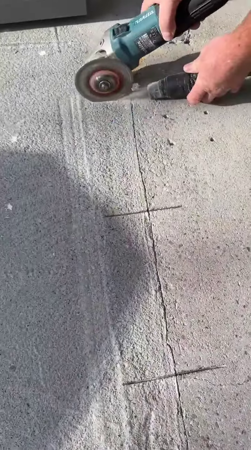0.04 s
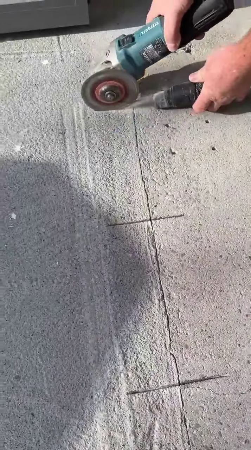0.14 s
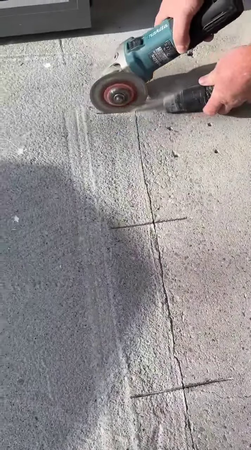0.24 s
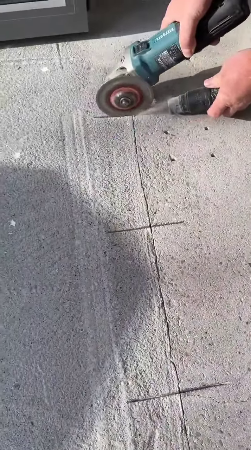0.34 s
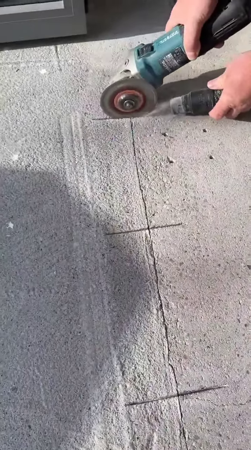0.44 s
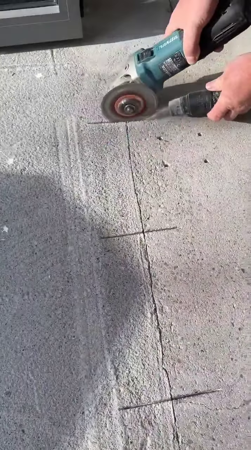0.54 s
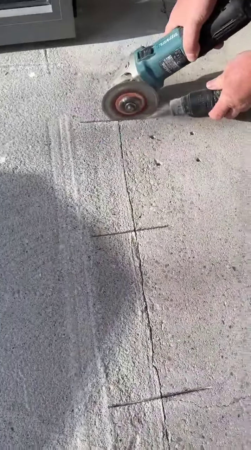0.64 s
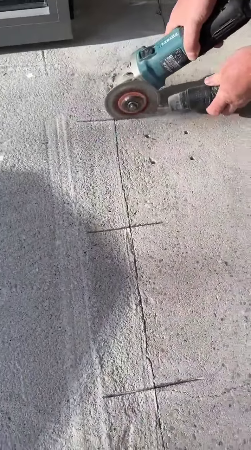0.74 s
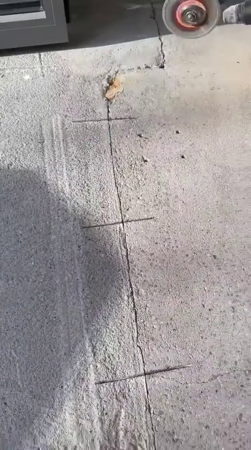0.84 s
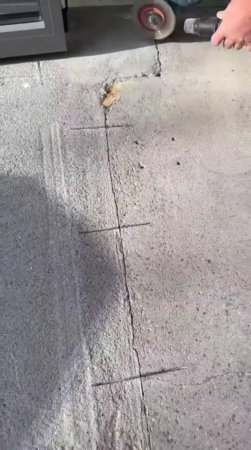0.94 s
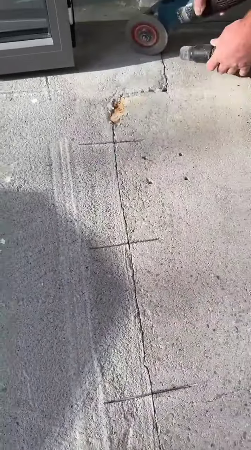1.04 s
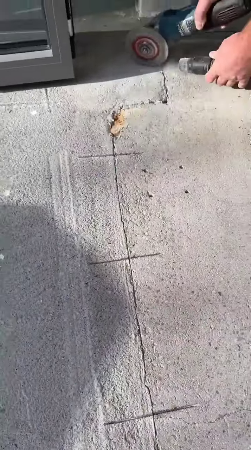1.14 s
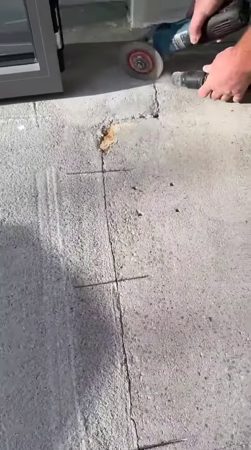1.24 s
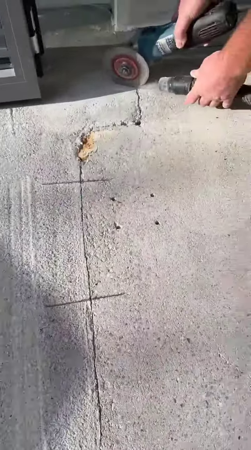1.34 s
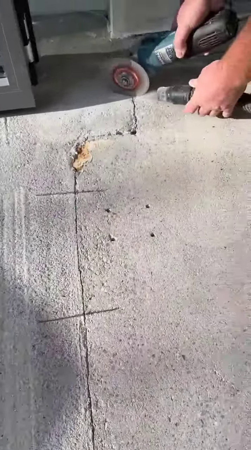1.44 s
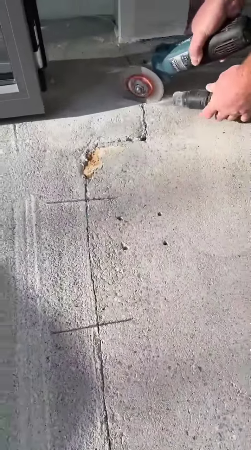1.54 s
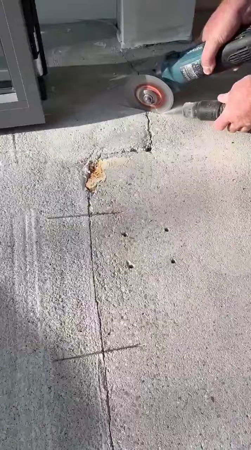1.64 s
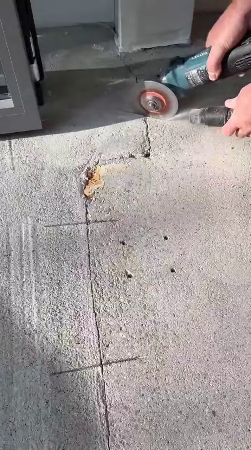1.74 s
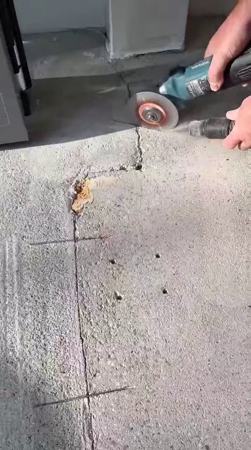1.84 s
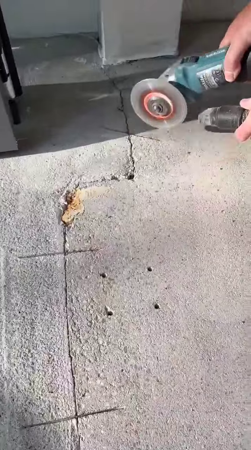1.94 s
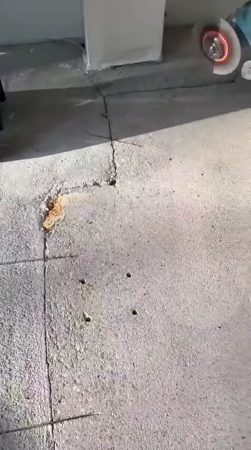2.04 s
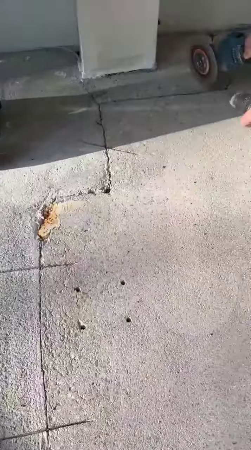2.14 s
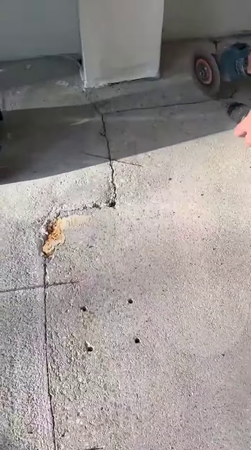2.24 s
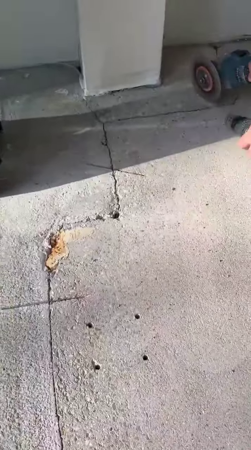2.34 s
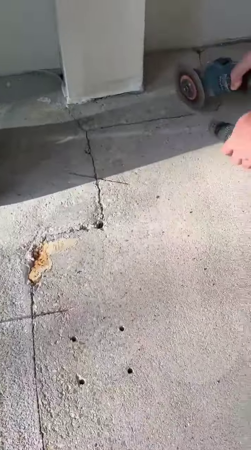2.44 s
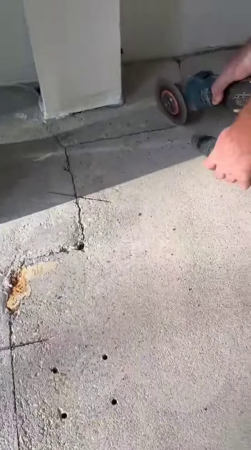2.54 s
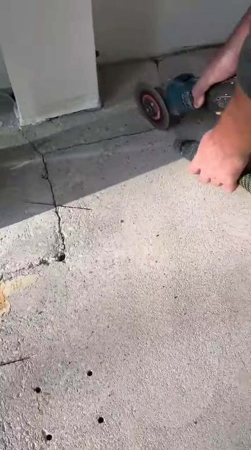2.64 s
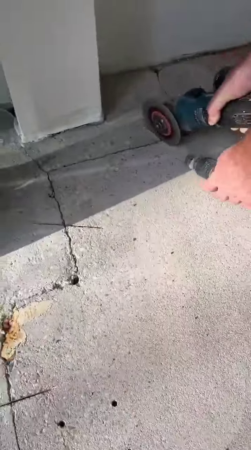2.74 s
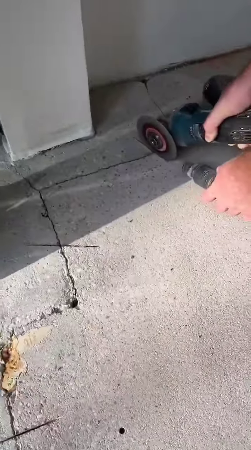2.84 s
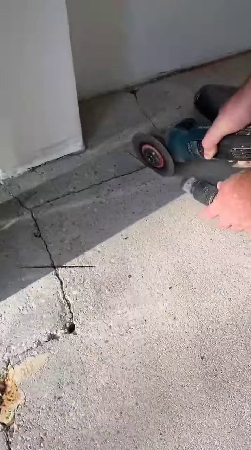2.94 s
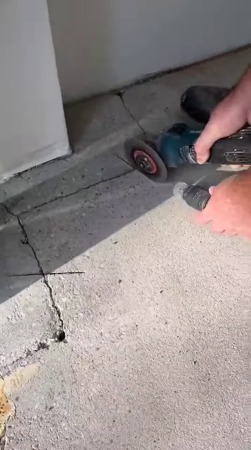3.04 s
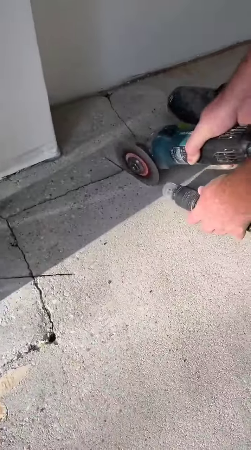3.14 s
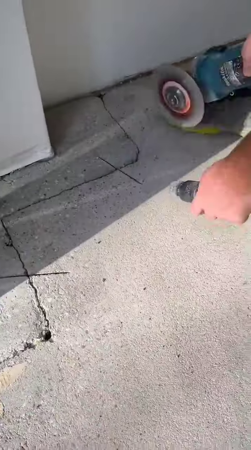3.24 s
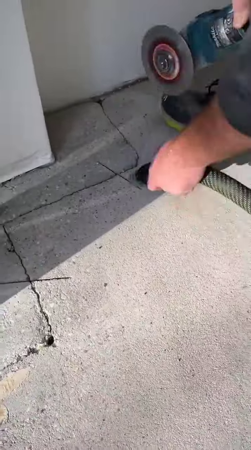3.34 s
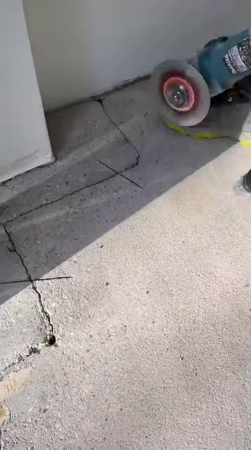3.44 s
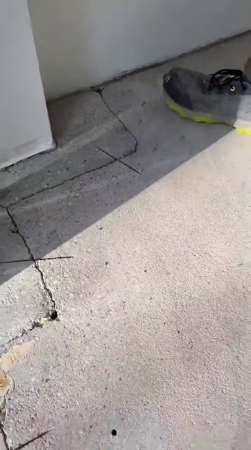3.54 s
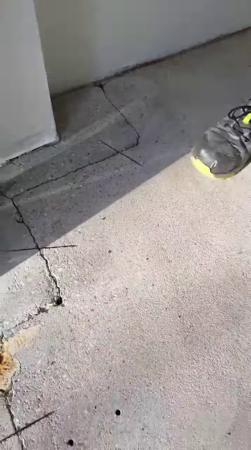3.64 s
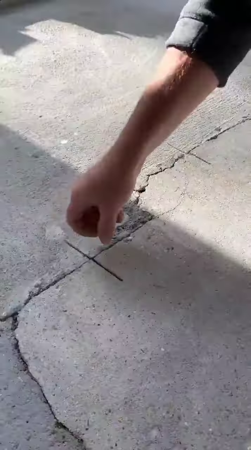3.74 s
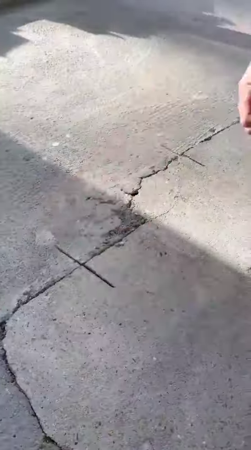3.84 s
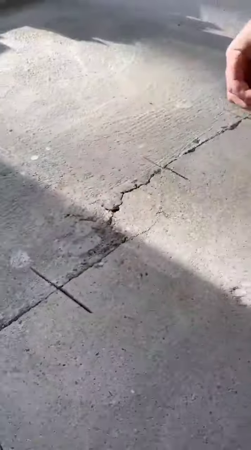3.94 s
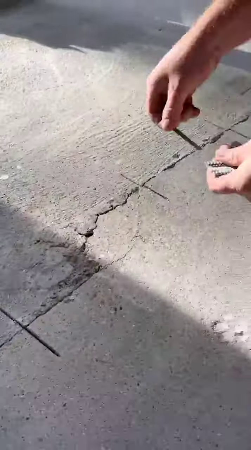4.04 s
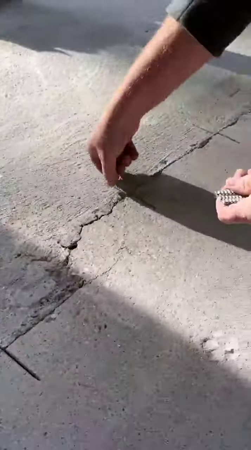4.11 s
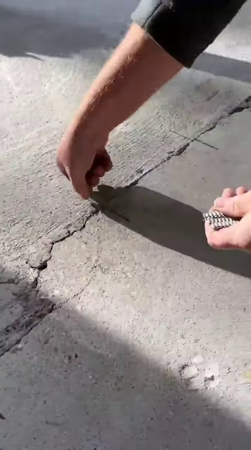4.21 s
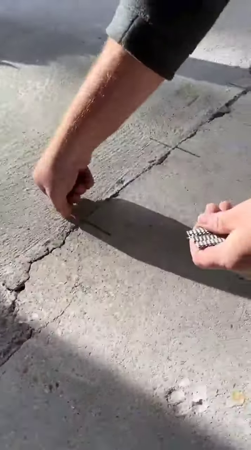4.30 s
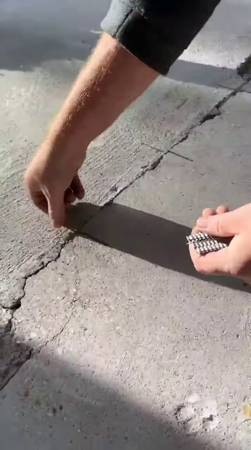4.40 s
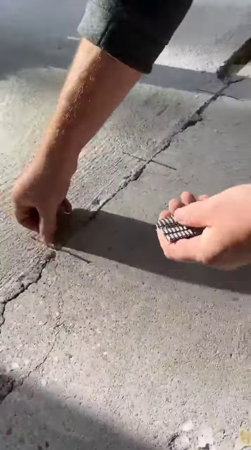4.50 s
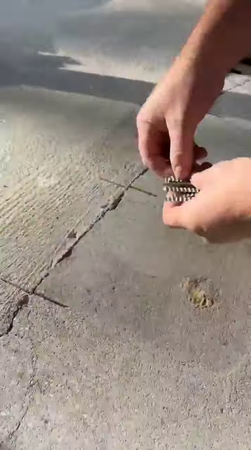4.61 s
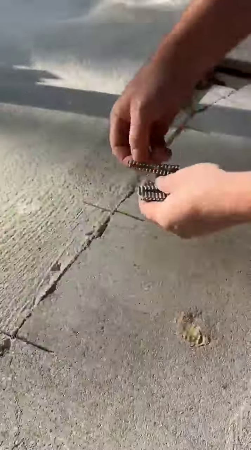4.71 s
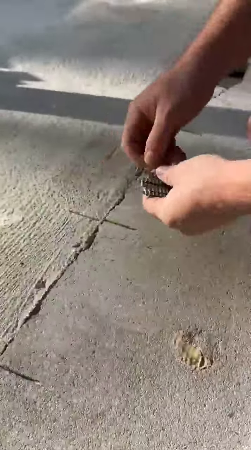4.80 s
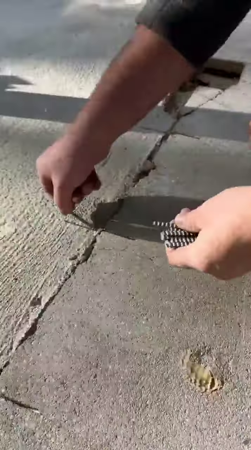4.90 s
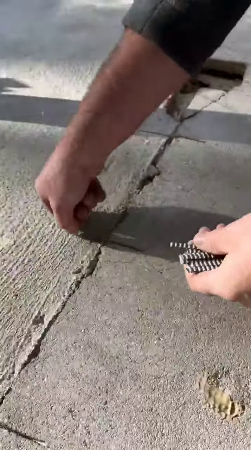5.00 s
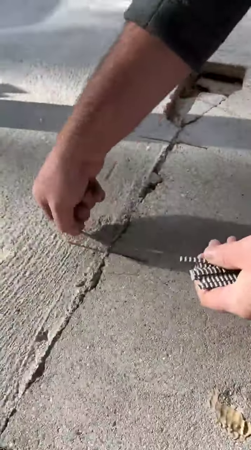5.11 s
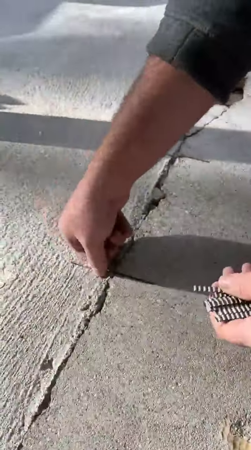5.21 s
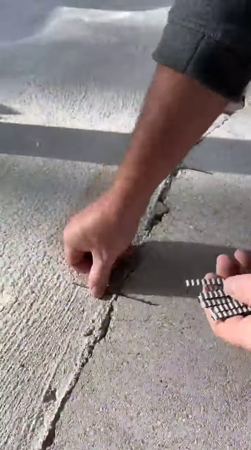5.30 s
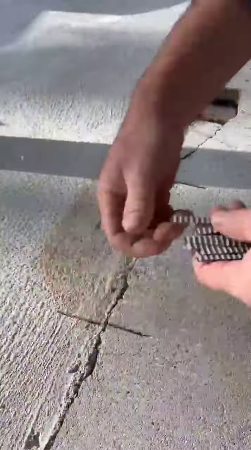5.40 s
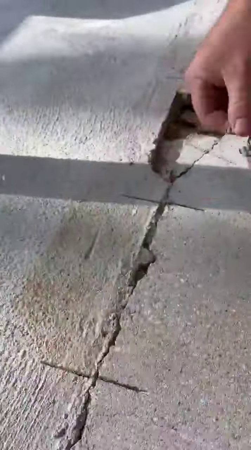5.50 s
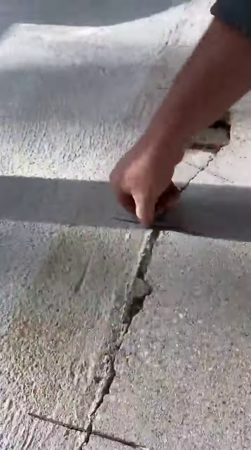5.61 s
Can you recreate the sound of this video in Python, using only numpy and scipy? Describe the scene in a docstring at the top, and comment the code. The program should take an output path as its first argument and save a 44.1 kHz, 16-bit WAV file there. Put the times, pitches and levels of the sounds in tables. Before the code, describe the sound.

An angle grinder cuts three short slots in cement with harsh ringing bursts, cuts off abruptly, then metal pins tick and scrape quietly.

```python
"""An angle grinder cuts three short slots in a cement floor, the first already under way, and runs free
between. Grit and slab impacts are coloured noise; the disc rings as narrow resonances over the turbulent fan
rush. The fan whine sags under load; brief squeals mark the groove and low thumps break in; near echoes shift
the colour. After the last cut the fan grows louder, then the scene changes to a quiet room with room tone,
cloth and rumble. Steel pins then tick and scratch, strokes scrape over gritty cement, and soft bumps jostle the
microphone."""
import sys
import numpy as np
from scipy import signal
from scipy.fft import rfft, irfft
from scipy.io import wavfile

SR = 44100
rng = np.random.default_rng(int(sys.argv[2]) if len(sys.argv) > 2 else 0)


def materialize(psi):
    """Save the field psi as 16-bit PCM at rate SR to the path in sys.argv[1].

    A 1-D psi becomes a single channel; in a 2-D psi each row is a channel.
    """
    bounded = np.clip(np.atleast_2d(psi).T, -1, 1)
    quanta = np.round(bounded * 32767).astype(np.int16)
    wavfile.write(sys.argv[1], SR, quanta)


N = 249596
T = np.arange(N) / SR  # time [s]
HZ = np.fft.rfftfreq(N, 1 / SR)  # frequency bins [Hz]
SCENE_CHANGE = 3.745  # the scene changes from the grinder to the pins [s]

# Cuts, with base levels at full depth: touch_s, lift_s, grind_db, crunch_db (slab), whine_db (loaded motor)
CUTS = [(-0.7, 0.778, -24, -42.3, -62), (1.06, 1.93, -23.9, -42.5, -58),
        (2.226, 3.172, -23.2, -41.3, -51.5)]
# Fan vents swing towards the microphone: peak_s, half_length_s, draught_db, whine_db (base levels)
SWINGS = [(0, .22, -52.5, -70), (1.347, 0.21, -56, -66), (2.26, .13, -54.5, -51.5), (2.6, .17, -53.5, -70),
          (3.56, .18, -58, -53.5)]


def gain_of(db):
    """Logarithmic level: converts decibels to an amplitude ratio."""
    return 10 ** (np.asarray(db) / 20)


def evened(x):
    """Normalization of mean power: scales to an rms of 1."""
    return x / np.sqrt(np.mean(abs(x) ** 2) + 1e-20)


def spectra(rows):
    """Interpolation on a logarithmic frequency axis: each column of a table, at every bin."""
    hz, *columns = np.transpose(rows)
    return [np.interp(np.log(HZ + 1), np.log(hz + 1), column) for column in columns]


def wander(rate_hz):
    """Low-pass noise: a slow random fluctuation of rms 1, with a Gaussian roll-off at the given rate."""
    points, points_per_s = 8192, 1000
    hz = np.fft.rfftfreq(points, 1 / points_per_s)
    low_pass = np.exp(-(hz / rate_hz) ** 2)
    slow = evened(irfft(rfft(rng.standard_normal(points)) * low_pass))
    return np.interp(T, np.arange(points) / points_per_s, slow)


def grains(per_s, spread_db):
    """Shot noise: two trains of tiny impacts at shared random moments, some larger than the rest."""
    struck_now = rng.random(N) < per_s / SR
    size = gain_of(spread_db * np.minimum(rng.exponential(1, N), 4)) * struck_now
    return evened(size * rng.standard_normal((2, N)))


def hiss():
    """White noise: two uncorrelated signals of equal power at all frequencies."""
    return rng.standard_normal((2, N))


def heard(pair, spectrum, diffuse=0):
    """Interchannel coherence: colours two signals and blends them; diffuse sound is less alike at the ports."""
    # The two microphone ports: frequency_hz, likeness (0-1), phase_rad
    ports = [(100, 1, 0), (400, 0.99, -0.5), (815, .45, 0.5), (1500, 0.99, 0), (2370, 1, 0.5),
             (4280, 0.84, 0.5), (4700, .3, 2), (5600, .995, -1), (7530, 1, 0.5), (8250, .85, 0.57),
             (9200, .5, -2), (10150, 0.67, -2), (11200, .999, -4)]
    same, phase = spectra(ports)
    same = np.clip(same * (1 - diffuse), 0, 1)
    a, b = rfft(pair) * gain_of(spectra(spectrum)[0])
    second = (same * a + np.sqrt(1 - same ** 2) * b) * np.exp(-1j * phase)
    return evened(irfft(np.array([a, second]), N))


def ring(x, hz, width, skirt):
    """Resonance: two poles at a moving frequency give steep skirts; a complex signal of rms 1."""
    turn = np.exp(2j * np.pi * np.cumsum(hz) / SR)
    r, q = np.exp(-np.pi * np.array([width, skirt]) / SR)
    return evened(turn * signal.lfilter([1], [1, -r - q, r * q], x / turn))


def struck(s, db, fall):
    """Exponential decay: an envelope that jumps up at s and dies away."""
    return (T >= s) * gain_of(db) * np.exp(-np.maximum(T - s, 0) / fall)


def swell(s, half, db):
    """Gaussian envelope: rises to its peak at s and falls to 1/e at half a length either side."""
    return gain_of(db) * np.exp(-((T - s) / half) ** 2)


def each_turn(pair, turns, share):
    """Cyclic correlation: the same parts come round again, so the noise partly repeats with every turn."""
    repeated = pair
    for k in (1, 2):
        earlier = np.interp(turns - k, turns, T, left=-1)  # the moment k turns ago
        repeated = repeated + share ** k * np.array([np.interp(earlier, T, x, left=0) for x in pair])
    return evened(repeated)


def plunge(touch, lift):
    """Contact loading of one cut: how hard the disc is pressed in and how deep it has sunk, both 0-1."""
    attack_s, touch_db = 0.055, -15  # pressed in from a light touch
    lift_s = 0.011  # pulled out quickly
    sink_s = 0.78  # time to reach full depth
    since = np.maximum(T - touch, 0)
    pressed = (T >= touch) * gain_of(touch_db * np.exp(-(since / attack_s) ** 2))
    pressed = pressed * np.exp(-np.maximum(T - lift, 0) / lift_s)
    return pressed, np.minimum(since / sink_s, 1)


def spindle_speed():
    """Load torque against inertia: the spindle slows as the slot deepens; in turns per second."""
    free_turns_per_s, sag_turns_per_s, inertia_s = 144, 24.5, 0.04
    bog_depth = 0.3  # share of full depth at which the motor bogs down
    load = np.zeros(N)
    for touch, lift, *_ in CUTS:
        pressed, depth = plunge(touch, lift)
        load += pressed * (1 - np.exp(-(depth / bog_depth) ** 2))
    lag = np.exp(-1 / (inertia_s * SR))
    return free_turns_per_s - sag_turns_per_s * signal.lfilter([1 - lag], [1, -lag], load)


def disc_modes(drift=0.003, disc_db=0.5):
    """Modal vibration: noise drives the disc's modes; moving contact detunes and favours each in turn."""
    # Disc modes: frequency_hz, width_hz (narrowed below), level_db (before disc_db), phase_rad (between ports)
    modes = [(3069, 82, -16, -0.6), (3346, 290, -9.5, 0.08), (3910, 86, -19.5, 1), (4355, 130, -12, 0.6),
             (4700, 29, -14, 1.32), (5393, 83, -9.5, 1.0), (5972, 80, -18, -0.5), (6950, 71, -10.5, 0.15),
             (7633, 70, -10, -1.1), (8880, 67, -6.5, -1.5), (9630, 32, -10.5, -1.85),
             (11020, 61, -12, -2.5)]
    detune = 1 + drift * wander(9.7)
    disc = np.zeros((2, N))
    for hz, width, db, phase in modes:
        level = gain_of(db + disc_db + 1.1 * wander(6.8))
        mode = level * ring(rng.standard_normal(N), hz * detune, 0.82 * width, skirt=560)
        disc += np.sqrt(2) * np.array([mode.real, (mode * np.exp(-1j * phase)).real])
    return disc


def cutting(turns, chatter_db=1.0, runout=0.1, grit_db=-3.5, slab_db=-0.5, ring_up_s=0.12):
    """Brittle fracture: diamonds chip the cement, so grit hisses, the slab crunches and the disc rings."""
    # The disc snags on a stone: peak_s, extra_db, half_length_s
    snags = [(0.105, 2.5, .01), (0.4, 1, .01), (0.722, 1.5, .01), (1.236, 5, .005), (1.491, 3, .008),
             (1.543, 1.5, .005), (1.604, 3.5, .012), (1.654, 3.5, .01), (1.822, 1.5, .01), (1.888, 4, .007),
             (2.768, 2, .006), (2.792, 3.5, .009), (2.815, 3, .006), (3.144, 1.5, .008), (3.163, 0.5, .006)]
    # Spectrum of shattering grit: frequency_hz, relative_db (per Hz)
    grit_colour = [(1200, -33), (2000, -9), (2500, -2.5), (3600, 0), (4300, 0), (4900, -12), (5250, -2.5),
                   (6600, -4), (7250, -10), (8300, -0.5), (9200, -3), (10200, 4.5), (11200, 2.5),
                   (11800, -14)]
    # Spectrum of the slab under it: frequency_hz, relative_db (per Hz)
    slab_colour = [(40, -25.5), (200, -18), (400, -13.5), (480, -8), (700, -3.5), (1080, 1), (1300, -2),
                   (1550, 2), (1900, 0), (2600, -9), (4500, -39.5)]
    crunch_power = 1.7  # a light touch hisses; the slab crunches only under pressure
    # at the surface it grinds less and crunches more than at full depth
    shallow_grind_db, shallow_crunch_db = -1.4, 3.2
    bite, crunch, ringing = np.zeros((3, N))
    for touch, lift, grind_db, crunch_db, _ in CUTS:
        pressed, depth = plunge(touch, lift)
        grind = pressed * gain_of(grind_db + shallow_grind_db * (1 - depth))
        bite += grind
        crunch += pressed ** crunch_power * gain_of(crunch_db + shallow_crunch_db * (1 - depth))
        # the disc rings more as it sinks into its slot
        ringing += grind * (1 - np.exp(-np.maximum(T - touch, 0) / ring_up_s))
    # the hand-held disc chatters, and bites harder once a turn
    snag_db = sum(db * swell(s, half, 0) for s, db, half in snags)
    force = gain_of(chatter_db * wander(78) + snag_db) * (1 + runout * np.cos(2 * np.pi * turns))
    grit = heard(grains(per_s=14000, spread_db=2), grit_colour)
    grit = gain_of(grit_db) * each_turn(grit, turns, share=0.32)
    slab = heard(grains(per_s=4500, spread_db=2.5), slab_colour)
    slab = gain_of(slab_db) * each_turn(slab, turns, share=0.39)
    return force * (ringing * disc_modes() + bite * grit + crunch * slab)


def fan_rush(turns, fan_db=-42.5, flutter_db=0.5):
    """Turbulent flow noise: the fan's broadband rush partly repeats each turn and grows as it nears."""
    # Spectrum of the motor fan: frequency_hz, relative_db (per Hz)
    fan_colour = [(40, -23.5), (130, -17), (350, -6.5), (800, -9), (1100, -5), (1650, -9), (2400, 1.5),
                  (3400, 2.5), (4500, 1), (5600, 2.5), (7500, 1.5), (9500, 3.5), (11000, -3.5), (12000, -9)]
    # after the last cut the grinder is lifted towards the microphone
    nearing_s, nearing_db_per_s = 3.32, 15
    nearing_db = nearing_db_per_s * (np.clip(T, nearing_s, SCENE_CHANGE) - nearing_s)
    level = gain_of(fan_db + nearing_db + flutter_db * wander(80))
    return level * each_turn(heard(hiss(), fan_colour), turns, share=0.18)


def vent_draught(away_db=-68):
    """Flow buffeting: low noise from the vents swells as they swing towards the microphone."""
    # Spectrum of the draught: frequency_hz, relative_db (per Hz)
    draught_colour = [(20, -20.5), (60, -1), (130, -4.5), (280, -0.5), (420, -3), (700, -10), (1500, -25.5)]
    air = gain_of(away_db) + sum(swell(s, half, air_db) for s, half, air_db, _ in SWINGS)
    return air * gain_of(2.0 * wander(25)) * heard(hiss(), draught_colour)


def motor_whine(speed, turns, fuzzy_db=-3, clean_db=-2.5, width_hz=16):
    """Rotational tone: four cycles a turn, a sine plus a narrow noise band, so its pitch sags under load."""
    level = np.zeros(N)
    for touch, lift, _, _, loaded_db in CUTS:
        pressed, depth = plunge(touch, lift)
        level += pressed * depth ** 2 * gain_of(loaded_db)
    for s, half, _, tone_db in SWINGS:
        level += swell(s, half, tone_db)
    clean = np.sin(2 * np.pi * 4 * turns)
    fuzzy = ring(rng.standard_normal(N), 4 * speed, width_hz, skirt=110).real
    return level * (gain_of(fuzzy_db) * fuzzy + gain_of(clean_db) * clean)


def reflected(pair, sway=0.0498):
    """Comb filtering: near echoes whose paths change as the hands move, so the colour keeps shifting."""
    # Echoes from the floor and the wall: delay_s (mean), level_db
    echoes = [(.0021, -15.5), (.0047, -12.5), (0.0117, -14.5)]
    out = pair
    for delay, db in echoes:
        earlier = T - delay * (1 + sway * wander(3.01))
        out = out + gain_of(db) * np.array([np.interp(earlier, T, x, left=0) for x in pair])
    return out


def hollowed(pair, notch_hz=4920, width_hz=440):
    """Band cancellation: now and then removes a narrow treble band from what the two channels share."""
    # The treble hollows out: peak_s, half_length_s, depth (0-1)
    hollows = [(0.07, .1, 1), (0.42, .17, 1), (0.69, .1, .9), (1.2, .08, 1), (1.78, .2, 1), (2.98, .2, 1)]
    depth = sum(share * swell(s, half, 0) for s, half, share in hollows)
    turn = np.exp(2j * np.pi * notch_hz * T)
    smooth = signal.butter(1, width_hz / SR)
    # shift the band down to zero frequency, smooth it, and shift it back
    band = 2 * (turn * signal.filtfilt(*smooth, pair.mean(0) / turn, padlen=0)).real
    return pair - np.clip(depth, 0, 1) * band


def groove_squeals(width_hz=28):
    """Narrow-band resonance: short fuzzy tones as the disc sings in its groove, and one brief swell of the
    motor whine near 580 Hz."""
    # Squeals, and at 1.84 s a swell of the motor whine: peak_s, half_length_s, pitch_hz, level_db
    songs = [(0.684, .1, 1010, -50), (0.701, 0.081, 7660, -32), (1.3, 0.092, 1130, -49),
             (1.78, .1, 6970, -33.5), (1.84, .12, 580, -57), (2.32, .05, 7520, -31.5),
             (2.472, 0.06, 1608, -42), (2.59, 0.14, 1530, -43), (2.799, .035, 840, -45),
             (2.8, .04, 7640, -30), (3.142, 0.037, 6960, -29)]
    out = np.zeros(N)
    for s, half, hz, db in songs:
        tone = np.sqrt(2) * ring(rng.standard_normal(N), np.full(N, hz), width_hz, skirt=200).real
        out += swell(s, half, db) * tone
    return out


def low_thumps():
    """Decaying bursts: short thumps of low noise."""
    # Knocks: start_s, level_db, fall_s
    thumps = [(1.164, -32, 0.01), (1.235, -38.5, 0.0098), (2.079, -59, 0.014), (2.308, -39.5, 0.021),
              (2.335, -38.5, .014), (2.36, -40.5, 0.017)]
    # Spectrum of a knock: frequency_hz, relative_db (per Hz)
    knock_colour = [(25, -21), (70, -4.5), (150, -1.5), (280, -2.5), (500, -7.5), (800, -6.5),
                    (2000, -21.5)]
    return sum(struck(*row) for row in thumps) * heard(hiss(), knock_colour)


def grinder():
    """Superposition: cutting and fan with echoes, groove sounds, whine and draught all end sharply when the
    scene changes."""
    speed = spindle_speed()
    turns = np.cumsum(speed * (1 + 0.005 * wander(30))) / SR
    machine = hollowed(reflected(fan_rush(turns) + cutting(turns)))
    machine = machine + groove_squeals() + low_thumps()
    machine = machine + motor_whine(speed, turns) + vent_draught()
    fade_s = 0.0099
    return machine * np.clip((SCENE_CHANGE - T) / fade_s + 1, 0, 1)


def room_tone(room_db=-60):
    """Diffuse field: steady coloured noise of the room in the second scene."""
    # Spectrum of the room: frequency_hz, relative_db (per Hz)
    room_colour = [(100, -3.5), (210, -9.5), (500, -7.5), (750, -13.5), (1400, -21), (2400, -24),
                   (4900, -34), (6000, -31), (8700, -40), (11000, -46)]
    return (T > SCENE_CHANGE) * gain_of(room_db) * heard(hiss(), room_colour, diffuse=0.18)


def sleeves(rest_db=-74):
    """Friction of cloth: dense grains rustle as the arm reaches for each pin."""
    # Reaches, added to the resting rustle: peak_s, half_length_s, level_db
    reaches = [(3.77, .06, -61), (3.942, 0.043, -61), (4.26, .08, -66.5), (4.57, .11, -58.5),
               (5.045, 0.057, -65.5), (5.209, .05, -63), (5.557, 0.19, -52.5)]
    # Spectrum of cloth: frequency_hz, relative_db (per Hz)
    cloth_colour = [(100, -2), (350, 12), (600, 9.5), (1200, -0.5), (3000, -3.5), (4800, -3), (7500, -1),
                    (10000, -4.5), (12000, -19.5)]
    moving = gain_of(rest_db) + sum(swell(*row) for row in reaches)
    cloth = heard(grains(per_s=8000, spread_db=3.5), cloth_colour, diffuse=0.15)
    return (T > SCENE_CHANGE) * moving * gain_of(1.8 * wander(40)) * cloth


def handling(buffet_db=-55.5, rise_db_per_s=3):
    """Structure-borne noise: lumpy low rumble and soft bumps on the hand-held microphone."""
    # Spectrum of low buffeting: frequency_hz, relative_db (per Hz)
    buffet_colour = [(20, -11), (45, -2.5), (70, -0.5), (110, -4.5), (170, -14), (300, -19.5), (700, -44.5)]
    # Soft bumps: peak_s, peak_db, pitch_hz, length_s (between the 1/e points)
    jolts = [(4.622, -37, 75, 0.023), (4.81, -33, 74.6, 0.016), (5.345, -27, 81, 0.027),
             (5.559, -34, 134, 0.0138), (5.572, -38, 75.4, .02)]
    # the rumble grows as the microphone follows the arm
    rumble_db = buffet_db + rise_db_per_s * (T - SCENE_CHANGE) + 1.9 * wander(17)
    out = (T > SCENE_CHANGE) * gain_of(rumble_db) * heard(hiss(), buffet_colour, diffuse=0.021)
    for s, db, hz, length in jolts:
        out += swell(s, length / 2, db) * np.cos(2 * np.pi * hz * (T - s))
    return out


def pin_ticks(decay_s=0.006, tail_db=-17, tail_s=0.023):
    """Damped impact: pins held in the fist cannot ring long, so dry ticks have only a short room tail."""
    # Pins tick against each other and the floor: start_s, level_db (before the tail is added)
    contacts = [(3.797, -53), (3.951, -53), (4.06, -54), (4.392, -54.5), (4.755, -53), (4.763, -45.5),
                (4.851, -51), (5.077, -37), (5.086, -43), (5.285, -41.5), (5.298, -46)]
    # Spectrum of a tick: frequency_hz, relative_db (per Hz)
    tick_colour = [(200, -4), (700, 7.5), (1500, -6), (3500, -2.5), (6000, 2), (9000, 1.5), (11500, 1)]
    envelope = sum(struck(s, db, decay_s) + struck(s, db + tail_db, tail_s) for s, db in contacts)
    return envelope * heard(hiss(), tick_colour, diffuse=0.24)


def scrapes(ring_db=-3, rasp_db=-2):
    """Granular friction: short strokes over the floor, from a dull, hollow rasp to bright loose sand."""
    # Strokes on gritty cement: peak_s, level_db (base), rise_s, fall_s, sand (bright share of power, 0-1)
    strokes = [(3.805, -53, .012, 0.03, 1), (4.53, -61.5, .05, 0.038, 0), (5.048, -42.5, .011, 0.011, 0.3),
               (5.082, -48.5, .006, .011, .05), (5.296, -53, .008, .012, .05),
               (5.37, -43, 0.01, 0.034, 0.93), (5.472, -39, 0.0088, 0.018, 0.33),
               (5.535, -47, 0.025, 0.023, .25), (5.608, -35, 0.012, .017, 0.18),
               (5.655, -48, .012, .02, 0.5)]
    # Spectrum of a dull scrape: frequency_hz, relative_db (per Hz)
    scrape_colour = [(80, 0), (400, -2), (750, 2), (1400, 0), (1900, -7), (3400, -7.5), (5000, -7.5),
                     (8000, -15.5), (12000, -38)]
    # Spectrum of loose sand: frequency_hz, relative_db (per Hz)
    sand_colour = [(100, -4), (600, 2), (1500, -11), (3500, -2.5), (7500, 0), (9500, 0.5), (12000, -17)]
    # Resonances of a scrape: frequency_hz, width_hz, relative_db
    resonances = [(570, 180, 1), (980, 140, 1.5), (1390, 180, -1.5), (1980, 200, -5), (3200, 220, -10),
                  (4240, 240, -13)]
    dull, bright = np.zeros((2, N))
    for s, db, rise, fall, sand in strokes:
        shape = np.exp(-(np.minimum(T - s, 0) / rise) ** 2 - np.maximum(T - s, 0) / fall)
        power = (gain_of(db) * shape) ** 2
        dull += (1 - sand) * power
        bright += sand * power
    grit = grains(per_s=3500, spread_db=2.8)
    body = sum(gain_of(db) / (1 + 2j * (HZ - hz) / width) for hz, width, db in resonances)
    hollow = gain_of(ring_db) * evened(irfft(rfft(grit[1]) * body, N))
    rasp = gain_of(rasp_db) * heard(grit, scrape_colour, diffuse=0.33) + hollow
    loose_sand = heard(grains(per_s=9000, spread_db=0.5), sand_colour, diffuse=0.16)
    return np.sqrt(dull) * rasp + np.sqrt(bright) * loose_sand


def pin_scratches(width_hz=400):
    """Resonant friction: a pin's end scratches in its slot as a decaying band of pitched noise."""
    # Scratches: start_s, level_db (of the complex resonance; its real part is heard), pitch_hz, fall_s
    scratches = [(3.856, -48, 2100, .006), (3.857, -56, 3070, 0.0045), (4.181, -58, 1550, 0.01),
                 (4.215, -63, 1900, .02), (4.274, -65, 2700, .01), (4.315, -59.5, 3500, .006),
                 (5.043, -41, 1250, .012)]
    out = np.zeros(N)
    for s, db, hz, fall in scratches:
        tone = ring(rng.standard_normal(N), np.full(N, hz), width_hz, skirt=900).real
        out += struck(s, db, fall) * tone
    return out


def scene():
    """Superposition in time: the cutting, then the pins going in."""
    quiet = room_tone() + sleeves() + handling()
    return grinder() + quiet + pin_ticks() + scrapes() + pin_scratches()


def record(dry):
    """Band limitation: a linear-phase low-pass sets the recorder's upper edge."""
    edge_hz = 11800
    low_pass = signal.firwin(401, edge_hz, window=("kaiser", 9), fs=SR)
    return signal.oaconvolve(dry, low_pass[None], "same")


dry = scene()
out = record(dry)
materialize(out)
```